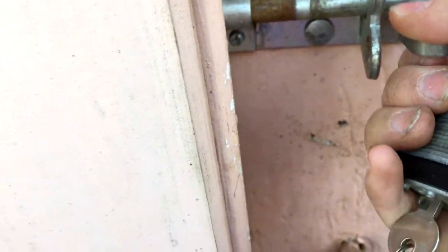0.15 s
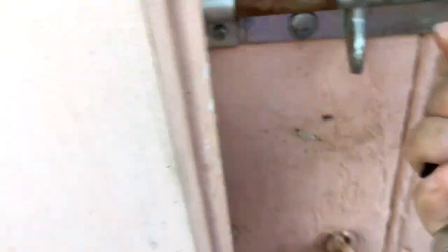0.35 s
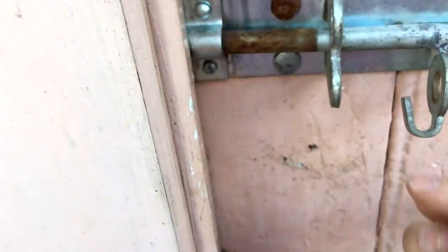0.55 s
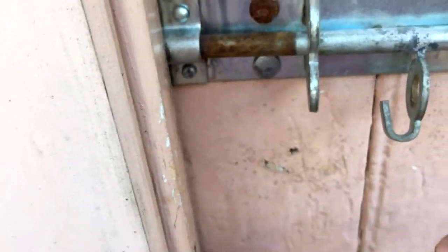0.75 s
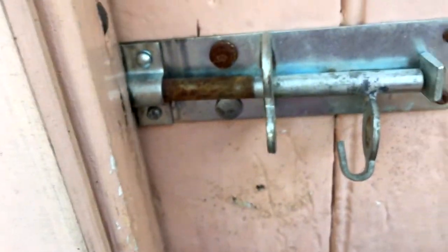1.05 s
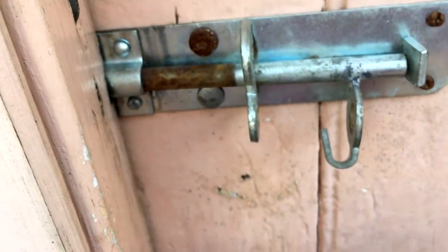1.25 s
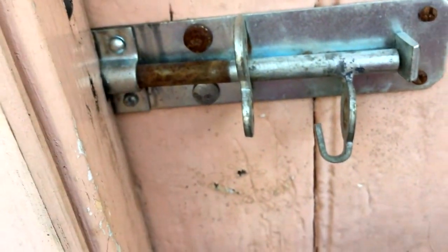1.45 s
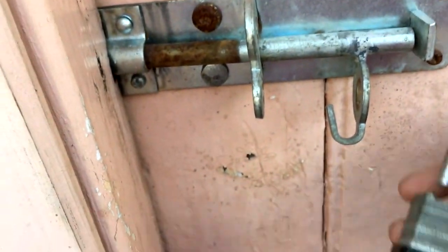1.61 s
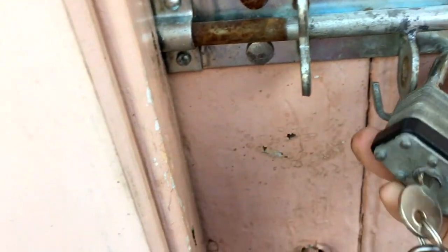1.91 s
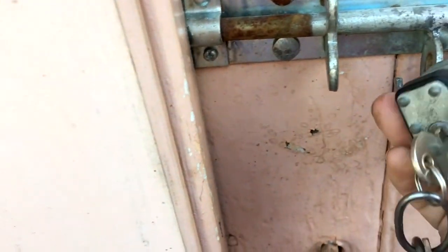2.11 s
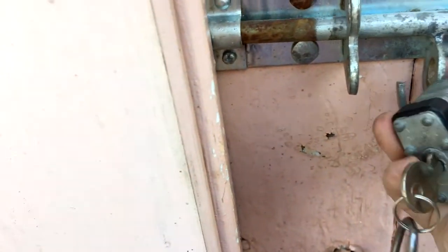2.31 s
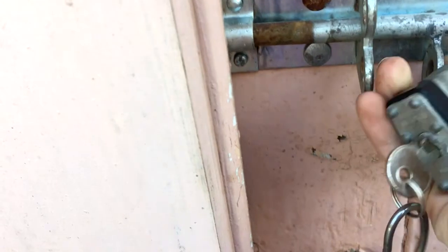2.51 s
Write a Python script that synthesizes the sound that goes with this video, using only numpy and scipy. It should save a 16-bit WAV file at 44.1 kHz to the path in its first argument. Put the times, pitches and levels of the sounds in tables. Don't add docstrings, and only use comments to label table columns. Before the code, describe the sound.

Keys jangle, thin and bright, throughout. A short gritty scrape at 0.2 s leads into a hard double metal clack at 0.25 s, with another clack at 0.5 s. Lighter clinks continue, with a small knock at 1.3 s. A ringing key clash comes at 1.65 s as low wind swells. From 2.0 to 2.6 s the padlock fumbles, knocking, rubbing and thudding on wood. Close, dry, faint hiss.

```python
import sys
import numpy as np
from scipy import signal
from scipy.io import wavfile
from scipy.ndimage import uniform_filter1d

SR = 44100
rng = np.random.default_rng(int(sys.argv[2]) if len(sys.argv) > 2 else 0)


def unload_audio(sound):
    columns = np.transpose(np.atleast_2d(sound))
    steps = np.round(np.clip(columns, -1, 1) * 32767)
    wavfile.write(sys.argv[1], SR, steps.astype(np.int16))


def invert_db(level):
    return 10 ** (np.asarray(level, dtype=float) / 20)


N = 119070

# mode_hz, level_db, t60_s
LATCH_MODES = [(419, -6.5, .02), (562, -2.5, 0.011), (714, -5.5, 0.023), (957, -2.5, 0.015),
               (1304.5, -3.5, 0.015), (1611, -7.5, 0.02)]
# mode_hz, level_db, t60_s
PADLOCK_MODES = [(1950, -7, 0.0041), (2790, -3, 0.0072), (3543, -5, .008), (4360, -7.5, 0.0034),
                 (6300, -4, 0.0023), (7980, -5, 0.00147)]


def decay(t, t60):
    return (t >= 0) * np.exp(-np.log(1000) * np.maximum(t, 0) / max(t60, 1e-3))


def resonate(x, hz, t60):
    radius = np.exp(-np.log(1000) / (max(t60, 1e-3) * SR))
    angle = 2 * np.pi * hz / SR
    gain = np.sin(angle) * 2 * np.sqrt(1 - radius)
    return signal.lfilter([gain], [1, -2 * radius * np.cos(angle), radius * radius], x)


def high_pass(x, hz, order):
    return signal.sosfilt(signal.butter(order, hz, "high", fs=SR, output="sos"), x)


def walk(rate):
    k = int(SR / rate)
    steps = np.repeat(rng.standard_normal(N // k + 1), k)
    wander = uniform_filter1d(uniform_filter1d(steps, k), k)[:N]
    return wander / wander.std()


def bursts(t, times, dbs, t60):
    return sum(invert_db(db) * decay(t - start, t60) for start, db in zip(times, dbs))


def ramps(t, rows):
    env = 0
    for start, length, db_from, db_to in rows:
        progress = np.clip((t - start) / length, 0, 1)
        active = (t > start) * (t < start + length)
        env = env + active * invert_db(db_from + (db_to - db_from) * progress)
    return env


def white():
    return rng.standard_normal(N)


def grit():
    contacts = rng.random(N) < 5000 / SR
    g = contacts * invert_db(2.5 * rng.exponential(size=N)) * white()
    return g / g.std()


def body(modes, env, source):
    total = sum(invert_db(db) * resonate(env * source(), hz, t60) for hz, db, t60 in modes)
    return total / np.sqrt(len(modes))


def keys(t):
    # start_s, tick_db, small_key_db, flat_key_db, long_key_db
    key_clinks = [(0.0107, -21, -41.5, -65, -44), (0.0937, -34.5, -48, -59, -57),
                  (0.1116, -26.5, -32.5, -57, -52), (0.1476, -36, -42, -47, -64),
                  (0.3107, -19, -38.5, -41.5, -55), (0.355, -24, -36, -32.5, -50),
                  (0.5052, -19, -38, -53, -31), (0.603, -24.5, -48, -48, -51),
                  (0.6954, -35, -30.5, -30, -43), (0.7535, -15.5, -45, -36.5, -36),
                  (0.784, -49, -68, -70, -66.5), (0.9607, -49, -50.5, -61.5, -46),
                  (0.9917, -19.5, -32, -48, -25), (1.029, -18, -39, -70, -33.5),
                  (1.3039, -22.5, -60, -42.5, -53.5), (1.3375, -26, -43, -59, -35),
                  (1.4089, -12, -32, -52, -38.5), (1.5192, -26.5, -38, -44.5, -50.5),
                  (1.5609, -15, -36, -59.5, -60.5),
                  (1.5899, -30.5, -40.5, -57, -55), (1.6484, -10.5, -53, -20, -15.5),
                   (1.6619, -8, -24, -17, -12.5), (1.6861, -27, -36, -28, -27),
                   (1.6984, -30, -44.5, -50.5, -44), (1.7739, -18, -36, -44, -41),
                   (1.8884, -12, -28.5, -32.5, -36.5), (1.92, -23.5, -58, -56, -43),
                   (1.9525, -37, -43, -65, -39.5), (2.0123, -19.5, -34, -39.5, -40.5),
                   (2.0402, -3, -51, -46, -47), (2.074, -21, -56, -63, -43.5), (2.17, -14, -34, -24, -28),
                   (2.3016, -2, -37.5, -30.5, -22), (2.389, -19.5, -24, -35, -35.5),
                   (2.4465, -21.5, -22, -74, -29.5), (2.5222, -24, -27, -64, -53.5),
                   (2.5519, -22.5, -36, -34, -50.5), (2.582, -24, -48, -58.5, -51),
                   (2.602, -24, -29.5, -45, -42)]
    # start_s, level_db
    light_ticks = [(0.0558, -35), (0.2502, -2), (0.2613, 0), (0.4983, 1), (0.5214, -23), (0.5846, -24.5),
                   (0.7478, -30), (1.0424, -21), (1.0819, -27), (1.164, -41.5), (1.468, -38),
                   (1.5085, -24.5), (1.5426, -28.5), (1.5516, -18.5), (1.5722, -28.5), (1.7973, -24),
                   (1.8114, -22.5), (1.86, -34), (2.0262, -32), (2.055, -32), (2.0874, -29), (2.095, -31),
                   (2.312, -14), (2.3292, -9), (2.4065, -8), (2.421, -22), (2.43, -20), (2.4791, -34),
                   (2.5895, -18), (2.626, -32)]
    # mode_hz, level_db, t60_s
    small_key = [(9900, -1, .03), (9945, -17, .13), (9530, -7, .02), (10200, -8, .015), (5700, -10, .025)]
    # mode_hz, level_db, t60_s
    flat_key = [(11552, 0, .12), (15460, -14, .05)]
    # mode_hz, level_db, t60_s
    long_key = [(13030, -2, .07), (13160, -6, .03), (12880, -12, .04), (6896, -20, .05)]
    # start_s, length_s, level_db
    buzzes = [(1.335, 0.0532, -50), (1.66, 0.03, -32), (2.07, 0.026, -48.5)]

    clinks, light = np.array(key_clinks), np.array(light_ticks)
    last = np.maximum(np.searchsorted(clinks[:, 0], t) - 1, 0)
    last_light = np.maximum(np.searchsorted(light[:, 0], t) - 1, 0)
    since = t - clinks[last, 0]
    attack = np.minimum(np.abs(since) / .0008, 1)
    tick_t60_s = .0045
    taps = bursts(t, light[:, 0], light[:, 1], tick_t60_s)
    soft_taps = np.minimum(taps, invert_db(-20))
    buzz = sum((t > start) * (t < start + length) * invert_db(db) for start, length, db in buzzes)

    out = 0
    for column, modes in enumerate((small_key, flat_key, long_key), start=2):
        for j, (hz, db, t60) in enumerate(modes):
            level_chance, pitch_chance, fade_chance = rng.standard_normal((3, len(clinks)))[:, last]
            scatter_db = 4 * level_chance * (j > 0)
            size = invert_db(clinks[last, column] + db + scatter_db + 2.2 * walk(150))
            fade = decay(since * np.exp(.15 * fade_chance), t60) * attack
            out = out + size * fade * np.sin(2 * np.pi * hz * (1 + 0.0025 * pitch_chance) * since)
            light_chance = rng.standard_normal(len(light))[last_light]
            tap = soft_taps * invert_db(db - 24 + 7 * light_chance) * white()
            out = out + resonate(tap, hz, t60 / 4)
            out = out + resonate(buzz * invert_db(db) * grit(), hz, t60 / 2)

    hits = taps + bursts(t, clinks[:, 0], clinks[:, 1], tick_t60_s)
    tick = hits * invert_db(-10) * white()
    ring = invert_db(clinks[last, 2:].max(axis=1) - 14) * decay(since, .07)
    chatter = np.diff((ring + buzz / 5) * grit(), prepend=0)
    return high_pass(out + high_pass(tick + chatter, 6000, 3), 2900, 4)


def knocks(t):
    # start_s, latch_db, thud_db, crack_db
    padlock_knocks = [(0.2502, -5.5, -24.5, -11), (0.2613, -12, -32, -15), (0.264, -9, -31, -14),
                      (0.283, -37, -19, -53), (0.325, -36, -36, -44), (0.488, -26, -40, -40),
                      (0.4985, -8, -38, -9.5), (0.5065, -13, -30, -12), (1.3028, -30, -40, -22),
                      (1.864, -38.5, -44, -55.5), (1.897, -35.5, -48, -57),
                      (2.014, -31, -55, -46), (2.026, -29, -31, -46), (2.0405, -15.5, -25.5, -21),
                   (2.080, -14, -12, -46), (2.1305, -33, -24, -47), (2.173, -20, -29, -29),
                   (2.21, -27, -27.5, -34), (2.253, -20, -33, -30), (2.268, -42, -25.5, -40),
                   (2.3015, -19, -50, -24.5), (2.312, -16, -27.5, -21), (2.3295, -14.5, -12, -17),
                   (2.382, -31, -25, -54), (2.4062, -18, -22.5, -24), (2.444, -47, -30, -51),
                   (2.514, -31.5, -44.5, -54), (2.582, -36, -31.5, -37), (2.59, -36, -40, -38)]
    # mode_hz, level_db, t60_s
    door_modes = [(55, -10.5, 0.14), (75.04, 3, 0.38), (112.2, -2, 0.13), (145, 0.5, 0.18), (186, -2, 0.16),
                  (257.6, -2, 0.05)]

    start, latch_db, thud_db, crack_db = np.array(padlock_knocks).T
    rattle_t60_s, tail_t60_s, tail_db = .049, .22, -28
    rattle = bursts(t, start, latch_db, rattle_t60_s)
    rattle = rattle + bursts(t, start, latch_db + tail_db, tail_t60_s)
    crack = bursts(t, start, crack_db + 2.5, rattle_t60_s * .59)
    crack = crack + bursts(t, start, crack_db + tail_db, tail_t60_s)
    crack = crack + bursts(t, start, crack_db + 12, .0021)
    push = bursts(t, start, thud_db + 5, .036)
    lock = uniform_filter1d(body(PADLOCK_MODES, crack, white), size=3)
    return body(LATCH_MODES, rattle, white) + lock + body(door_modes, push, white)


def pings(t):
    # start_s, pitch_hz, level_db, t60_s
    metal_rings = [(.2615, 12100, -11, .028), (2.040, 10700, -30, .08), (1.305, 3176, -47, .35),
                   (1.662, 3176, -42, .09), (2.302, 10750, -36, .12), (2.59, 10700, -44, .08),
                   (2.345, 8850, -50, .15), (2.093, 14700, -32, .02), (2.446, 12200, -34, .04),
                   (2.613, 13100, -40, .03), (2.407, 12600, -26, .015), (.754, 6900, -42, .04),
                   (1.03, 6900, -48, .06), (1.337, 6900, -46, .15), (1.59, 7000, -50, .06),
                   (1.662, 6896, -28, .1), (2.075, 6950, -44, .09), (2.266, 6800, -36, .03),
                   (2.552, 6900, -52, .1), (1.41, 5350, -48, .06), (1.555, 5350, -52, .1),
                   (2.175, 5300, -46, .1), (2.015, 5550, -40, .04), (.992, 5700, -36, .04),
                   (1.338, 9930, -37, .25), (2.626, 6000, -44, .015), (2.585, 6200, -40, .015)]
    # start_s, pitch_hz, level_db, t60_s
    clacks = [(.4985, 1310, -6, .04), (.499, 6190, -12, .012), (.5, 4380, -18, .015),
              (.5055, 2790, -13, .015), (.2505, 3600, -14, .012), (.2505, 6900, -16, .008),
              (.264, 900, -10, .03), (1.303, 1750, -23, .02), (1.303, 953, -28, .03),
              (2.04, 7490, -12, .008), (2.0405, 3240, -22, .015), (2.173, 3450, -26, .015),
              (2.173, 1350, -26, .04), (2.21, 1600, -32, .03), (2.253, 1450, -26, .03),
              (2.302, 1310, -20, .06), (2.312, 2780, -18, .015), (2.3295, 3740, -10, .014),
              (2.4065, 1400, -15, .03), (2.4065, 3720, -22, .012), (2.59, 2900, -38, .02)]
    out = 0
    for start, hz, db, t60 in metal_rings + clacks:
        size = invert_db(db + 3 * walk(200))
        out = out + size * decay(t - start, t60) * np.sin(2 * np.pi * hz * (t - start))
    return out


def scrape(t):
    # start_s, length_s, start_db, end_db
    scrapes = [
        (.205, 0.014, -46, -35),
        (.222, 0.027, -24, -16),
        (.465, .033, -50, -40),
    ]
    env = ramps(t, scrapes)
    hiss = invert_db(-11) * np.diff(env * grit(), prepend=0)
    rasp = invert_db(-11) * resonate(env * grit(), 1700, .02)
    metal = body(LATCH_MODES[2:], env, grit) + body(PADLOCK_MODES, env * invert_db(-6), grit)
    return metal + hiss + rasp


def rub(t):
    # start_s, length_s, start_db, end_db
    rubs = [(.3, .07, -44, -52), (.42, .07, -56, -44), (1.84, .13, -57, -54), (2.02, 0.38, -44.5, -49.5),
            (2.35, .27, -40.5, -49.5)]
    return body(LATCH_MODES, ramps(t, rubs) * invert_db(3 * walk(60)), grit)


def rustle(t):
    # start_s, length_s, start_db, end_db
    rustles = [(2.04, .06, -62, -60), (2.17, .13, -56, -57), (2.33, .11, -56, -58), (2.445, .045, -49, -60),
               (2.52, .18, -60, -64)]
    return np.diff(ramps(t, rustles) * invert_db(3 * walk(90)) * grit(), prepend=0)


def air(t):
    # band_hz, density_db (per Hz)
    spectrum = [(15, -31), (25, 6.5), (170, -4), (500, -23), (988, -25), (2400, -34), (5500, -32.5),
                (11900, -35), (16000, -47.5)]
    band_hz, density_db = np.array(spectrum).T
    swell_db = 6 * np.exp(-((t - 1.72) / .2) ** 2)
    gust_db = 3 * walk(3.17)
    out = 0
    for hz in 28 * 2 ** np.arange(0, 9.3, .4):
        band = signal.butter(2, [hz / 1.15, hz * 1.15], "band", fs=SR, output="sos")
        gustiness = min(1, 113 / hz) ** 4
        motion_db = (swell_db + gust_db - .5 * walk(14)) * gustiness
        db = np.interp(np.log(hz), np.log(band_hz), density_db) + motion_db
        out = out + invert_db(db) * signal.sosfilt(band, white())
    return out * invert_db(-45) / out.std()


def scene():
    t = np.arange(N) / SR
    return (keys(t) + knocks(t) + pings(t) + scrape(t) + rub(t) + rustle(t) + air(t))[None]


def low_pass(x):
    return signal.sosfilt(signal.butter(12, 17150, fs=SR, output="sos"), x)


def record(dry):
    rounded = np.tanh(high_pass(dry, 45, 2))
    top_cut = signal.ellip(6, .5, 60, 15900, fs=SR, output="sos")
    mix = signal.sosfilt(top_cut, rounded)
    return low_pass(mix)


dry = scene()
out = record(dry)
unload_audio(out)
```